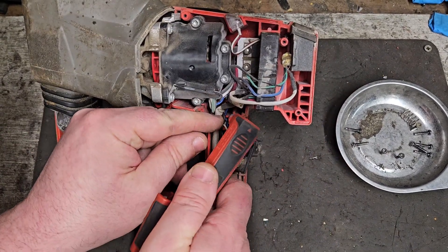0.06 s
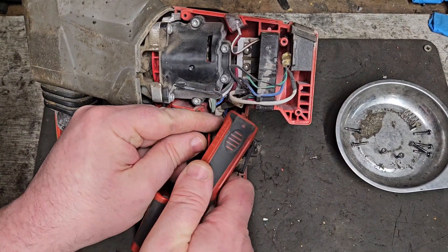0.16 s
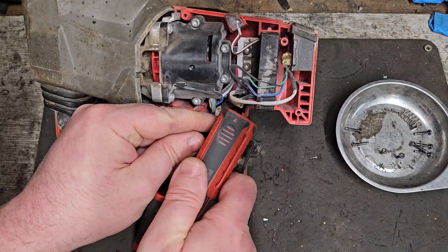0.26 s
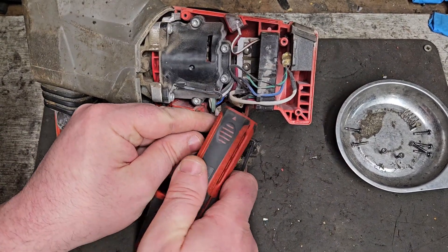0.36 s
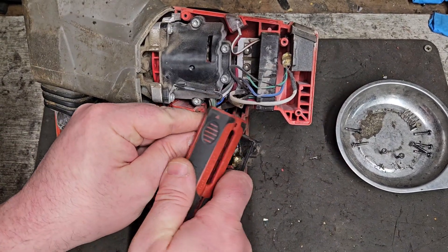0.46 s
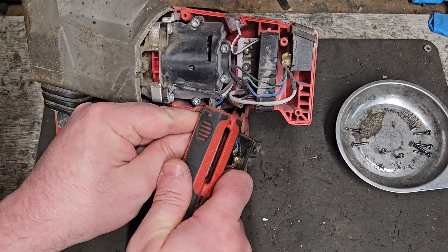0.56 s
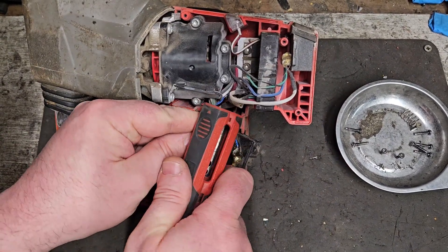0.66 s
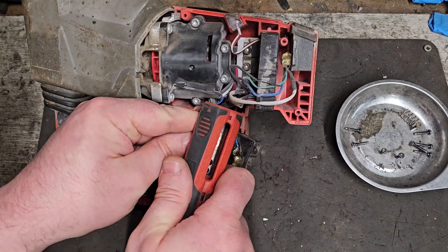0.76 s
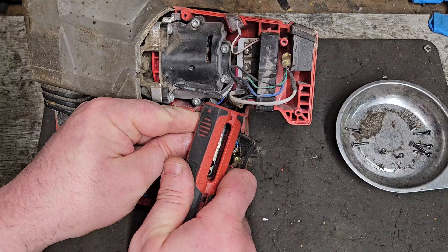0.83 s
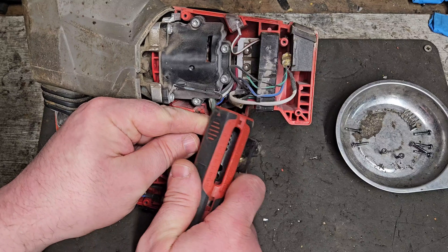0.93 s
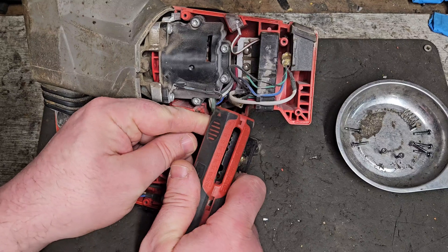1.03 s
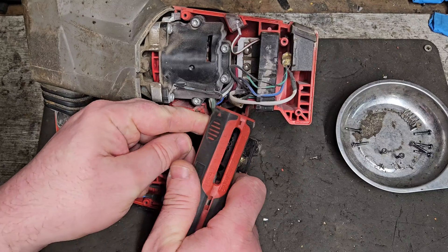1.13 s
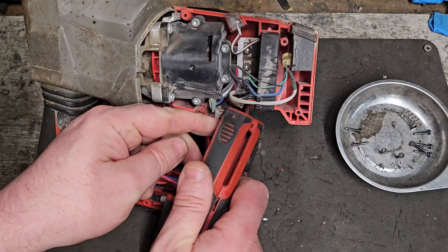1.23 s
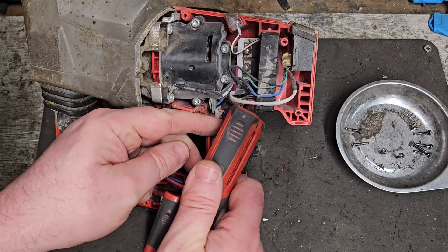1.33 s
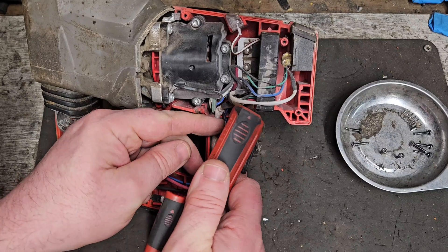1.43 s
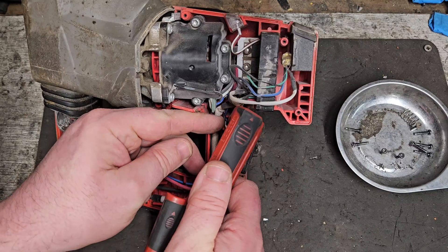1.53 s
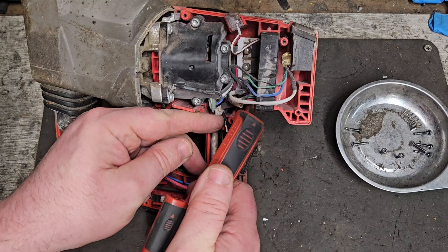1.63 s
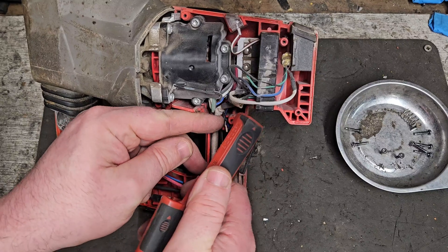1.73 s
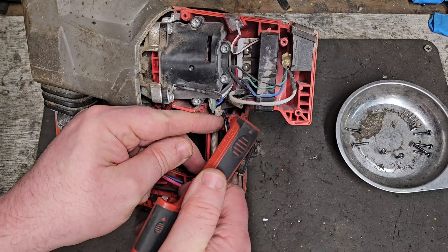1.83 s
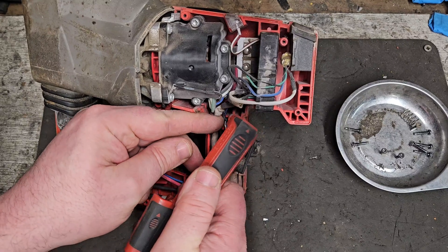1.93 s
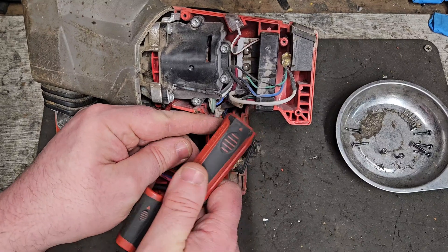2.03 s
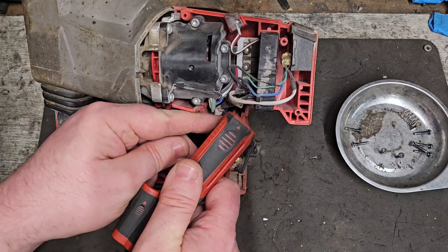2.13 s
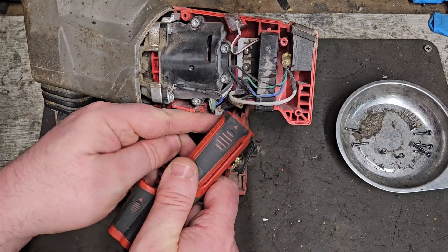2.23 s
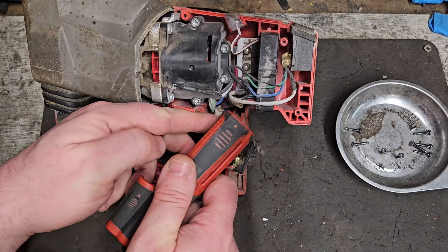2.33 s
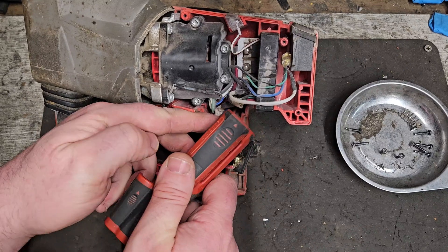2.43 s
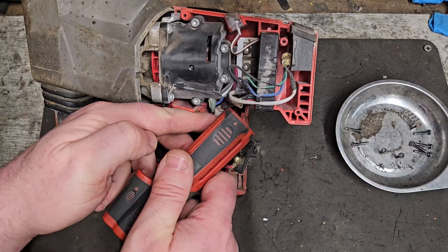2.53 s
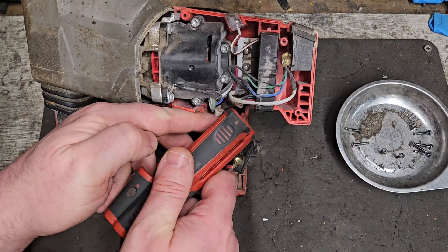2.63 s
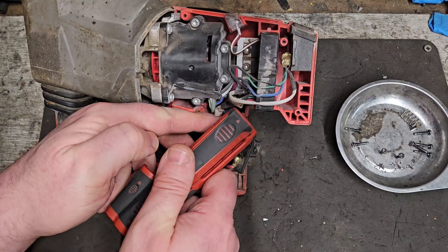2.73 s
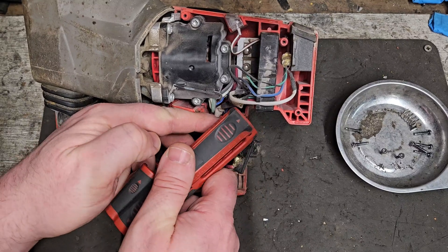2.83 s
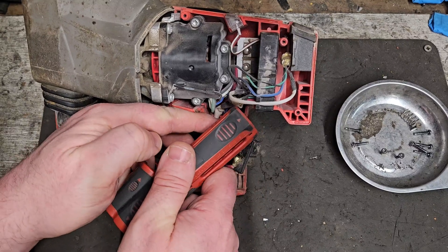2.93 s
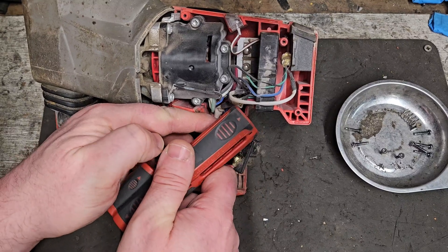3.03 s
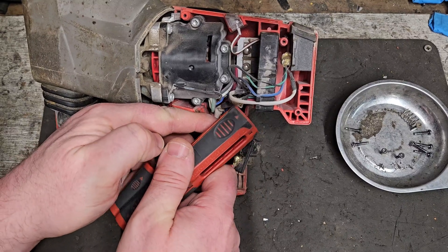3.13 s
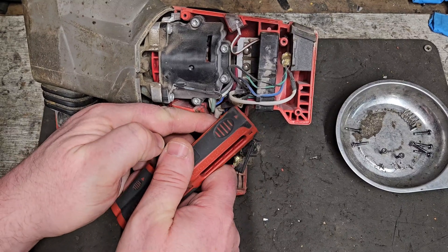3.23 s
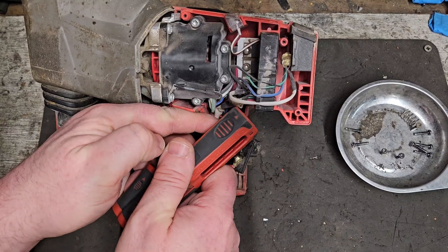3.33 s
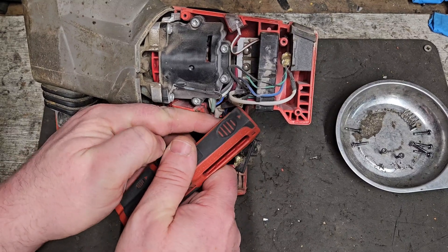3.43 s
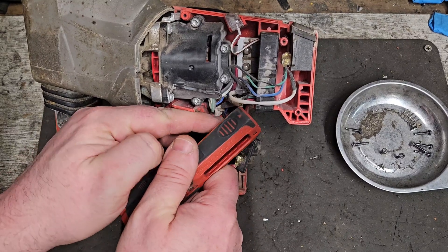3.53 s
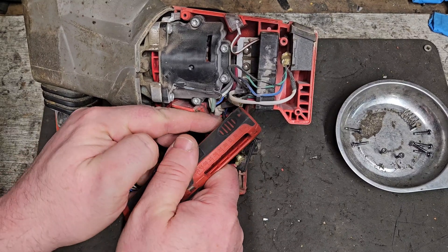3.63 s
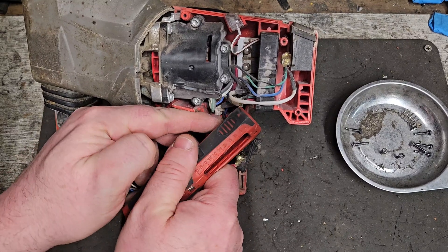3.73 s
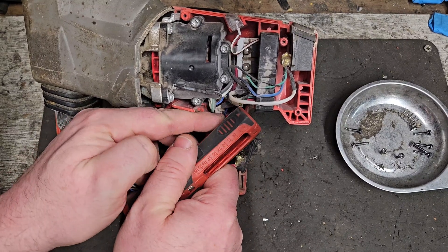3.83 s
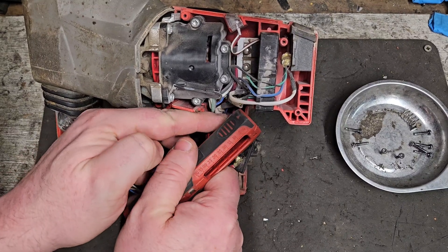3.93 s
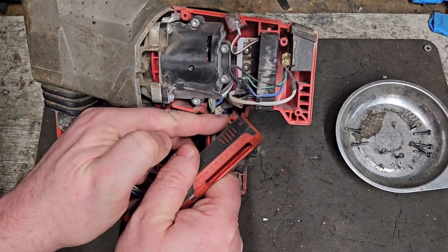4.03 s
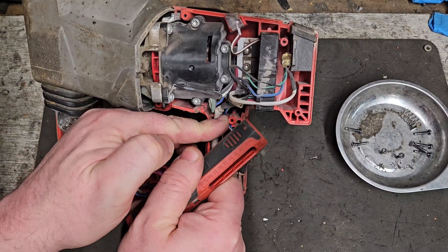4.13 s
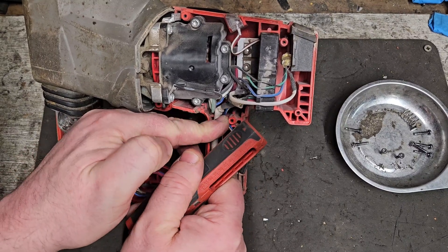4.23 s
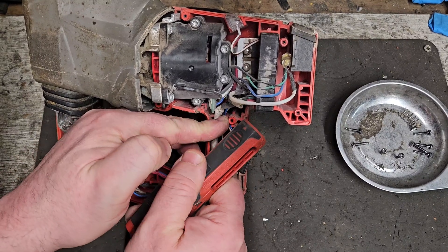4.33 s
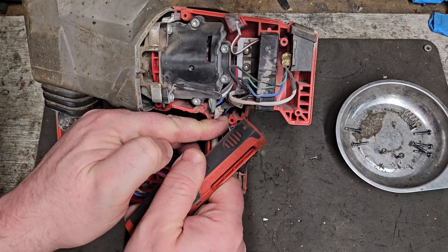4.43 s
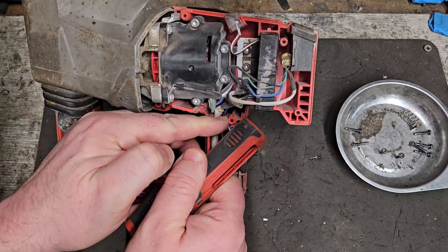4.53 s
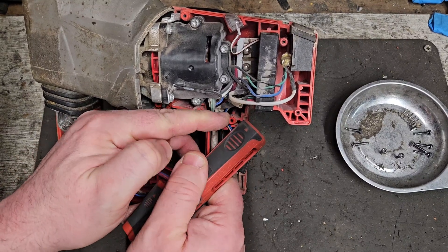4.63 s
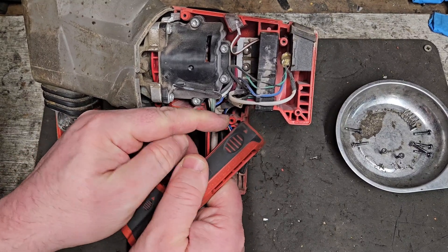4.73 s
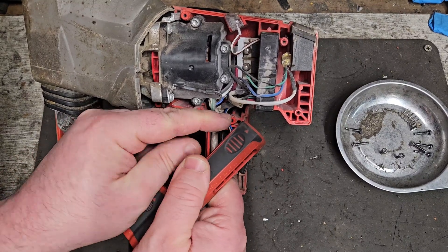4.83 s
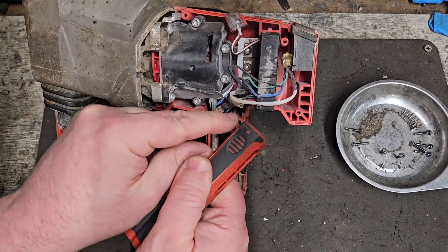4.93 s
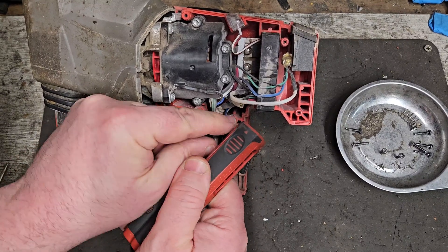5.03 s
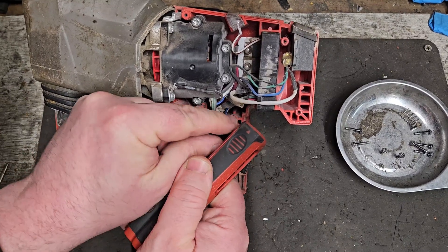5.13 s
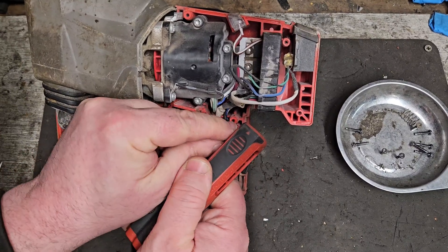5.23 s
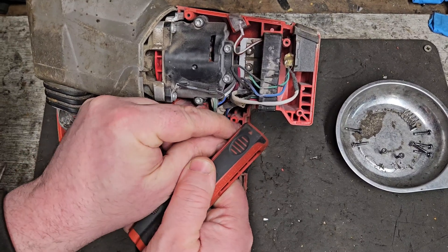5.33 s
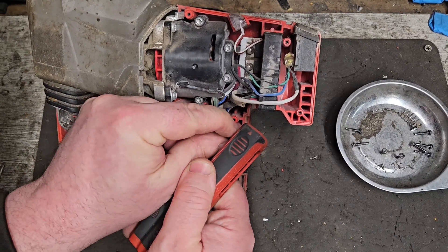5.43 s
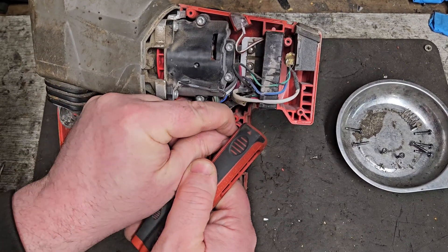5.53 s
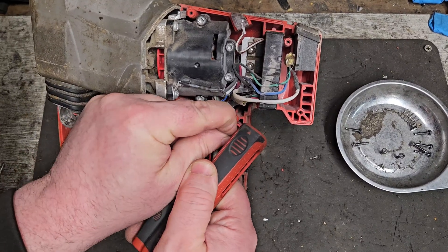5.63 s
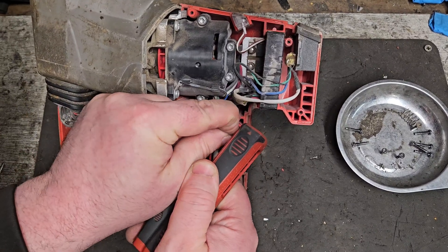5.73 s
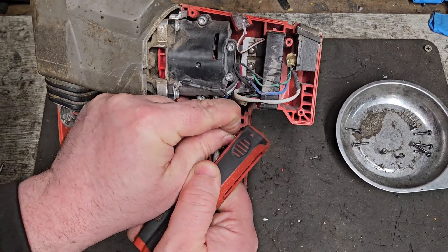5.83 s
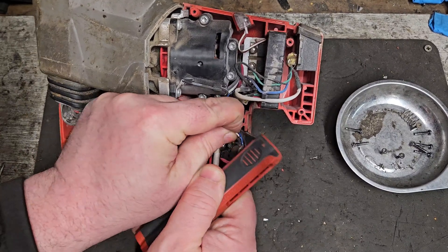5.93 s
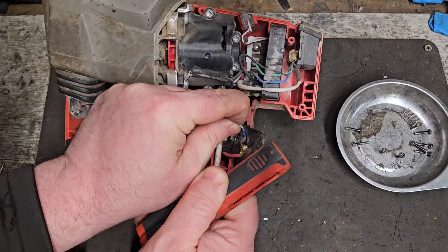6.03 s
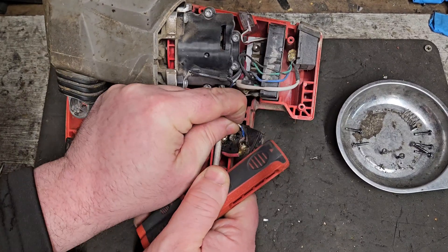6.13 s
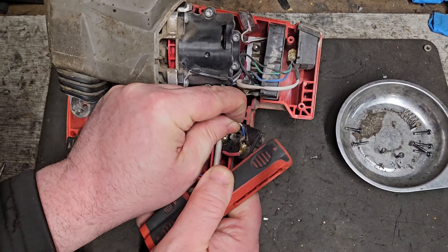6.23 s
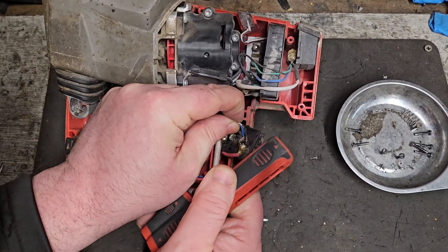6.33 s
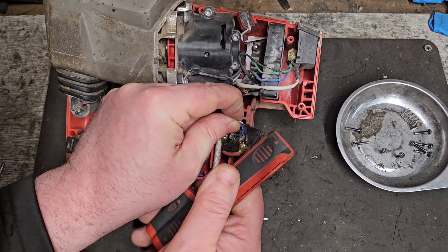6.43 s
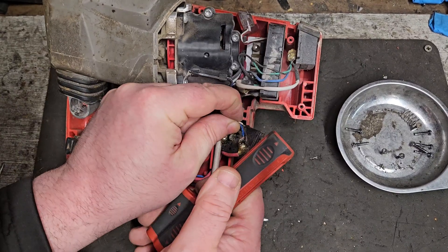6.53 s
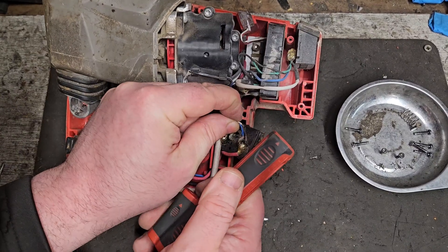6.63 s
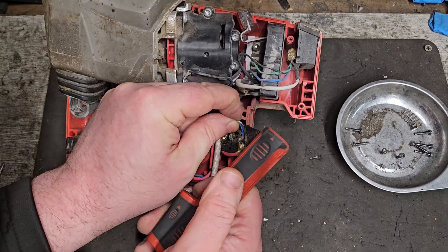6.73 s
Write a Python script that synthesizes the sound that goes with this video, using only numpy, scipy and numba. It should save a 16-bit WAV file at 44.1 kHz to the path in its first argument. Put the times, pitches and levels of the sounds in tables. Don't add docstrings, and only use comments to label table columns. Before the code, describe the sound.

A steady, deep ventilation rumble with very faint hiss fills a small workshop throughout, picked up close by a phone with bright treble. From 0.1 to 1.8 s there are faint finger rubs on a plastic handle and a few small dry ticks, clearer near 1.0 and 1.8. Between 2 and 3.2 s it is almost still, with tiny wire scratches and weak clicks. At 3.5 s a crisp click and a short sliding rub lead to a sharp, bright metallic snip at 3.6 s, with a brief ring and a short room echo. Soft ticks and handle scuffs continue to 4.9 s. Then dull touches and plastic clicks come at 5.0, 5.2 and 5.4, a bright casing knock at 5.54, another at 5.94, and the heaviest hollow thuds at 6.0-6.15 s with gritty contact. One faint rub and tick at 6.6 s end it over the rumble.

```python
import sys
import numpy as np
from scipy import signal
from scipy.fft import rfft, irfft
from scipy.io import wavfile
from scipy.ndimage import uniform_filter1d
from numba import njit

SR = 44100
rng = np.random.default_rng(int(sys.argv[2]) if len(sys.argv) > 2 else 0)


def log_audio(samples):
    frames = np.atleast_2d(samples).T
    limited = np.clip(frames, -1, 1)
    pcm = np.round(limited * 32767).astype(np.int16)
    wavfile.write(sys.argv[1], SR, pcm)


def decibels_to_gain(level_db):
    exponent = np.asarray(level_db, float) / 20
    return 10 ** exponent


N = 298998


def level(x, db):
    return x * decibels_to_gain(db) / np.sqrt(np.mean(x ** 2))


def colour(x, points):
    hz, db = np.transpose(points)
    n = x.shape[-1]
    f_hz = np.maximum(np.arange(n // 2 + 1) * SR / n, 1)
    gain_db = np.interp(np.log(f_hz), np.log(hz), db, -120, -120)
    return irfft(rfft(x) * decibels_to_gain(gain_db), n)


@njit
def svf(x, hz, width):
    y, band_state, low_state = np.empty(len(x)), 0., 0.
    for i in range(len(x)):
        g = np.tan(np.pi * hz[i] / SR)
        k = width / hz[i]
        v = (band_state + g * (x[i] - low_state)) / (1 + g * (g + k))
        band_state = 2 * v - band_state
        low_state = low_state + 2 * g * v
        y[i] = k * v
    return y


def resonate(x, hz, width_hz):
    return svf(x, np.full(len(x), 1. * hz), width_hz)


def band(x, lo_hz, hi_hz):
    edges_hz = [lo_hz, min(hi_hz, .45 * SR)]
    return signal.sosfilt(signal.butter(2, edges_hz, "band", fs=SR, output="sos"), x)


def body(x, modes, spread=1.0):
    total = 0
    for k, (hz, width_hz, db) in enumerate(modes):
        gain = (-1) ** k * decibels_to_gain(db) / np.sqrt(width_hz)
        total = total + gain * resonate(x, hz, spread * width_hz)
    return total


def grains(rate_hz, scatter_db, smooth):
    size_db = scatter_db * np.minimum(rng.exponential(size=N), 3)
    slips = (rng.random(N) < rate_hz / SR) * rng.choice([-1., 1.], N) * decibels_to_gain(size_db)
    return level(slips, 0) + smooth * rng.standard_normal(N)


def controls(rows, rise_db_s, fall_db_s):
    t = np.arange(N) / SR
    start, hold, db, *columns = np.transpose(rows)[:, :, None]
    rise_db = rise_db_s * np.maximum(start - t, 0)
    fall_db = fall_db_s * np.maximum(t - start - hold, 0)
    shapes_db = db - rise_db - fall_db
    loudest = np.argmax(shapes_db, axis=0)
    smoothed = [uniform_filter1d(c[loudest, 0], size=441) for c in columns]
    return [np.max(shapes_db, axis=0)] + smoothed


def place(x, pan_db, lead):
    early = np.append(x[lead:], np.zeros(lead))
    return np.array([early * decibels_to_gain(pan_db / 2), x * decibels_to_gain(-pan_db / 2)])


def add(out, x, s):
    i = int(s * SR)
    out[..., i:i + x.shape[-1]] += x[..., :N - i]


def snip():
    # t/s, peak level/dB
    bites = [
        (3.6047, -20),
        (3.6066, -1),
        (3.6088, -12),
        (3.6152, -22),
    ]
    # f/Hz, width/Hz, level/dB
    blade_modes = [(2800, 280, -10), (3360, 631, 9.5), (4140, 48, 5.5), (5540, 360, -14.5), (7000, 150, -9),
                   (6766, 420, -8.5), (8930, 210, -8), (10105, 360, -7), (11600, 230, -19),
                   (12220, 390, -24.5), (13594, 468.5, -24.5), (14100, 340, -21.5)]
    # f/Hz, level/dB, T60/s
    jaw_modes = [(2646, -12.5, 0.18), (3904, -13, 0.096), (4630, -7.5, 0.12), (5389, -4, 0.06),
                 (5880, -16.5, 0.16), (6440, -15, 0.2), (8850, -12, 0.08)]
    peak_db = (-21, -19)
    origin_s, jaw_db = 3.6, -46.5

    push, k = np.zeros((2, 12000)), np.arange(88)
    for s, db in bites:
        burst = rng.standard_normal((2, 88)) * np.exp(-k / 14.0) * np.minimum(k / 22.0, 1)
        opposed = burst[1] * np.array([[1], [-1]])
        add(push, decibels_to_gain(db) * (burst[0] + 0.8 * opposed), s - origin_s)
    ring = np.array([body(p, blade_modes, spread=2.8) for p in band(push, 1900, 14000)])
    ring = ring / np.abs(ring).max(axis=1, keepdims=True)

    t = np.maximum(np.arange(push.shape[1]) / SR + origin_s - bites[1][0], 0)
    jaw = 0
    for hz, db, t60_s in jaw_modes:
        phase = rng.random((2, 1))
        jaw = jaw + decibels_to_gain(db - 60 * t / t60_s) * (t > 0) * np.sin(2 * np.pi * (hz * t + phase))
    out = np.zeros((2, N))
    add(out, ring * decibels_to_gain(np.array(peak_db))[:, None] + decibels_to_gain(jaw_db) * jaw, origin_s)
    return out


def knocks():
    # start t/s, hold/s, thud level/dB, casing level/dB, grit level/dB
    contacts = [
        (4.935, 0.044, -67.5, -6.5, -15),
        (5.024, 0.01, -60, -27.5, -22),
        (5.228, 0.0166, -59.5, -18.5, -19),
        (5.402, 0.016, -55.5, -27, -46),
        (5.54, 0.005, -56, -4.5, -11.5),
        (5.943, 0.005, -58.5, -3.5, -7.5),
        (6.003, 0.015, -45, -16, -32),
        (6.02, 0.02, -38.5, -11, -21),
        (6.125, 0.012, -45.5, -7, -25),
        (6.139, 0.015, -43.5, -5.5, -19.5),
    ]
    # f/Hz, width/Hz, level/dB
    bench_modes = [(167, 36, 11.5), (232, 58, -1), (300, 46, 1.5), (392, 84, 5), (525, 22, -2.5)]
    # f/Hz, width/Hz, level/dB
    casing_modes = [(864, 15, -1.5), (1071, 34, 11), (1345, 6.1, 6.5), (1540, 88, 7.5)]

    db, casing_db, grit_db = controls(contacts, rise_db_s=2494, fall_db_s=399)
    bumps = grains(400, 2.5, smooth=0.86)
    thud_drive, casing_drive = decibels_to_gain(db), decibels_to_gain(db + casing_db)
    thud = level(body(bumps * thud_drive, bench_modes, spread=2.1), 0)
    thud = thud * np.sqrt(np.mean(thud_drive ** 2))
    casing = level(body(bumps * casing_drive, casing_modes, spread=3.0), 0)
    casing = casing * np.sqrt(np.mean(casing_drive ** 2))
    grit = level(band(bumps + 0.8 * rng.standard_normal(N), 2200, 15000), 0)
    grit = decibels_to_gain(db + grit_db) * grit
    return place(thud, 2.1, lead=2) + place(casing, 2.4, lead=10) + place(grit, 0.453, lead=2)


def blows():
    # t/s, peak level/dB, ring f/Hz
    hits = [(5.022, -51, 300), (5.031, -56.5, 600), (5.225, -53, 300), (5.394, -51, 422),
            (5.406, -51.5, 165), (5.541, -53, 300), (6.001, -37, 310.4), (6.018, -30, 300),
            (6.025, -36, 494), (6.03, -31, 167), (6.046, -36.5, 392), (6.067, -38, 300), (6.13, -38, 398),
            (6.14, -32.5, 392), (6.143, -37.5, 300), (6.144, -37.5, 861), (6.16, -48, 518),
            (6.181, -43.5, 377)]
    push_s, cycles = 0.002, 4.0
    out, t = np.zeros((2, N)), np.arange(12000) / SR
    for s, db, hz in hits:
        envelope = (1 - np.exp(-t / push_s)) * np.exp(-t * hz / cycles * 2)
        ring = np.sin(2 * np.pi * hz * t) * envelope
        add(out, place(decibels_to_gain(db) * ring / np.abs(ring).max(), 1.5, lead=6), s)
    return out


def ticks():
    # t/s, peak level/dB, ring f/Hz, crack level/dB
    clicks = [(0.291, -71.5, 1390, -25), (0.479, -67, 1320, -17), (0.862, -65, 1370, -30),
              (0.969, -56, 1500, -24), (1.422, -68, 1220, -15), (1.766, -57.5, 1540, -11.5),
              (2.638, -77, 2290, -10), (2.898, -89, 3200, -15), (3.117, -71.5, 1740, -26),
              (3.1192, -70, 3070, -48), (3.533, -55.5, 3220, -4), (3.841, -82, 1630, -1),
              (4.36, -69, 2074, -9), (4.875, -70, 1653, -8), (4.944, -74, 1100, -21.5),
              (5.023, -62, 647, -29.5), (5.16, -67.5, 1370, -35), (5.217, -55, 1710, -20),
              (5.36, -59, 1300, -13), (5.395, -59, 750, -32), (5.403, -63.5, 1340, -12),
              (5.422, -79, 1220, -19), (5.452, -69.5, 2100, -2), (5.536, -45.5, 3430, -29),
              (5.553, -59, 1530, -15), (5.797, -69.5, 1630, -12), (5.535, -42.5, 1280, -4),
              (5.931, -51, 1290, -10.5), (5.943, -52.5, 2080, 7), (5.982, -55, 1550, -23),
              (6.023, -45, 1500, -9.5), (6.036, -40, 1560, -26), (6.144, -42.5, 1135, -10),
              (6.588, -70, 1390, -4)]
    ring_t60_s, chatter_s, rise_s, knock_share = 0.007, 0.0022, 0.0022, 0.3
    out, t = np.zeros((2, N)), np.arange(4000) / SR
    envelope = np.exp(-t / chatter_s) * np.minimum(t / rise_s, 1)
    for s, db, hz, crack_db in clicks:
        chatter = rng.standard_normal((3, len(t))) * envelope
        ring = resonate(resonate(chatter[0], hz, 3.6 / ring_t60_s), hz, hz / 2)
        knock = band(band(chatter[1], 600, 3000), 700, 2500)
        crack = band(chatter[2], 2500, 14000)
        ring, knock, crack = (v / np.abs(v).max() for v in (ring, knock, crack))
        tick = ring + knock_share * knock + decibels_to_gain(crack_db) * crack
        add(out, place(decibels_to_gain(db) * tick, 5, lead=5), s)
    return out


def rubs(rows, ring_hz, hiss_hz):
    db, scratch_db, hiss_db = controls(rows, rise_db_s=718.5, fall_db_s=449.5)
    out = []
    common = grains(2500, 0.92, smooth=0.9)
    for side_db in (.5, -.5):
        slips = common + 0.1 * rng.standard_normal(N)
        ring = level(resonate(slips, ring_hz, 0.4 * ring_hz), 0)
        ring = ring + level(band(slips, 900, 2700), -7)
        scratch = decibels_to_gain(scratch_db) * level(band(slips, 2600, 3700), 0)
        hiss = decibels_to_gain(hiss_db) * level(band(slips, *hiss_hz), 0)
        out.append(decibels_to_gain(db + side_db - 3.0) * (ring + scratch + hiss))
    return np.array(out)


def handle_rubs():
    # start t/s, hold/s, level/dB, scratch level/dB, hiss level/dB
    strokes = [(0.13, 0.11, -99, 2.5, 6), (0.285, 0.033, -95, -29, -16), (0.475, 0.018, -85.5, -8.5, -8),
               (0.5, 0.11, -93.5, -7.5, -0.5), (3.44, 0.061, -84, -9.5, -12),
               (3.845, 0.039, -86.5, -7, -6.5), (3.92, 0.17, -96.5, -2, -1.5),
               (4.53, 0.028, -91.5, -12, -35), (4.605, 0.037, -79.5, -7.5, -4), (4.67, 0.07, -97, -3, 3.5),
               (4.87, 0.13, -83.5, -13, -2.5), (5.02, 0.2, -95, -10.5, 0), (5.455, 0.0066, -87.5, 9, 6.5),
               (5.79, 0.053, -89, -8, -5), (5.975, 0.016, -79.5, -21, -4.5), (6.58, 0.036, -95.5, -26, -16)]
    return rubs(strokes, ring_hz=1540, hiss_hz=(6200, 10800))


def wire_rubs():
    # start t/s, hold/s, level/dB, scratch level/dB, hiss level/dB
    strokes = [
        (2.07, 0.015, -102, 6.5, -8),
        (2.17, 0.037, -103, 6, 10),
        (2.3, 0.07, -99, -21, 15),
        (2.46, 0.0035, -100, -12, 7),
        (2.59, 0.014, -99, -21, -27),
        (2.64, 0.0065, -104, 16, -16),
        (2.675, 0.0058, -89, -11, -23),
        (2.715, 0.017, -89, -11, -22),
        (3.53, 0.0028, -74.5, -7.5, -11),
        (3.56, 0.1, -86, 4, 4),
    ]
    return rubs(strokes, ring_hz=2200, hiss_hz=(7650, 15100))


def echo(near):
    # f/Hz, level/dB
    wall_colour = [(300, -8), (1000, -6), (2500, -1), (4000, -3), (7000, 0), (16000, 2)]
    high_t60_s, low_t60_s, split_hz, rise_s = 0.15, 0.085, 1400, 0.0069
    t = np.arange(SR // 3) / SR
    walls = colour(rng.standard_normal((2, len(t))), wall_colour)
    high = band(walls, split_hz, 13000) * decibels_to_gain(-60 * t / high_t60_s)
    low = band(walls, 170, split_hz) * decibels_to_gain(-60 * t / low_t60_s)
    tail = (high + low) * np.minimum(t / rise_s, 1)
    tail = tail / np.sqrt(np.sum(tail ** 2, axis=1, keepdims=True))
    return decibels_to_gain(-11) * signal.fftconvolve(near, tail, axes=1)[:, :N]


def workshop():
    # f/Hz, level/dB per Hz
    rumble_psd = [(11, -48.5), (18, -37.5), (41, -4.5), (64, 5), (77, -2.5), (92, -12.5), (112, -9.5),
                  (126, -30.5), (194, -33.5), (227, -44), (247, -33), (309, -36), (346, -26.5),
                  (415, -38.5), (450, -54), (680, -61.5), (1140, -120)]
    # f/Hz, level/dB per Hz
    hiss_psd = [(330, -25), (700, 0), (1200, -3), (2200, -5), (4000, -7), (7000, -11), (16000, -12)]
    rumble_db, hiss_db = -50.5, -96
    mid, side = colour(rng.standard_normal((2, N)), rumble_psd)
    side = 0.0924 * side + 0.36 * band(side, 250, 800)
    rumble = level(np.array([1.04 * mid + side, mid - side]), rumble_db)
    return rumble + level(colour(rng.standard_normal((2, N)), hiss_psd), hiss_db)


def scene():
    near = snip() + knocks() + blows() + ticks() + handle_rubs() + wire_rubs()
    return near + echo(near) + workshop()


def roll_off(x):
    return signal.sosfilt(signal.butter(12, 16470, fs=SR, output="sos"), x)


def record(dry):
    # f/Hz, level/dB
    mic_response = [(10, -1.5), (6000, 22.5), (8400, 20.5), (9900, 8), (12500, 19), (15000, 11),
                    (16300, -18), (22050, -41.5)]
    return roll_off(colour(dry, mic_response))


dry = scene()
out = record(dry)
log_audio(out)
```